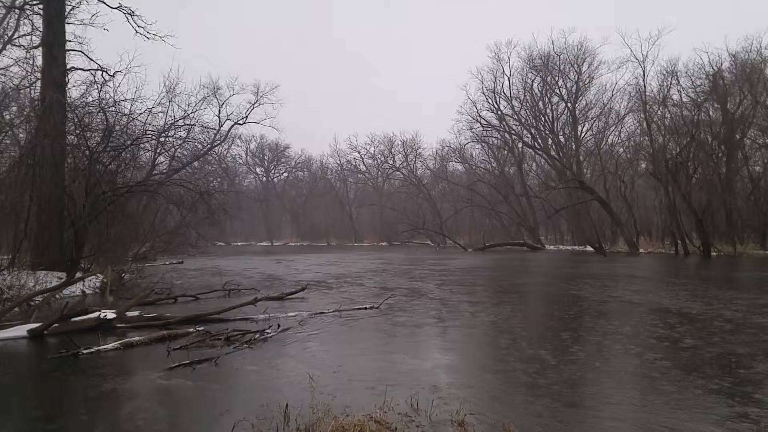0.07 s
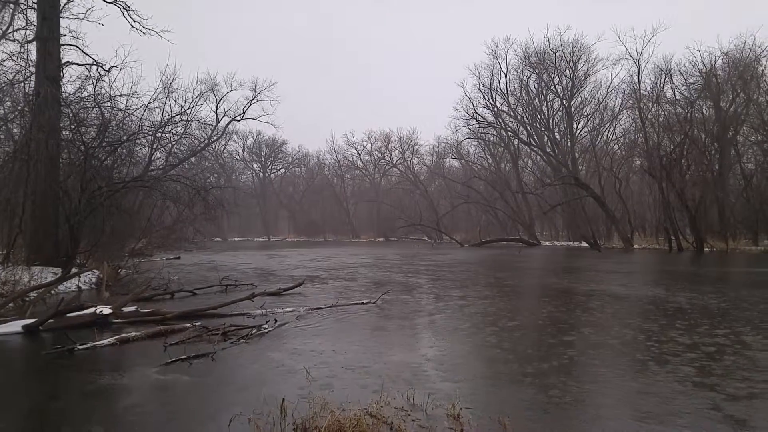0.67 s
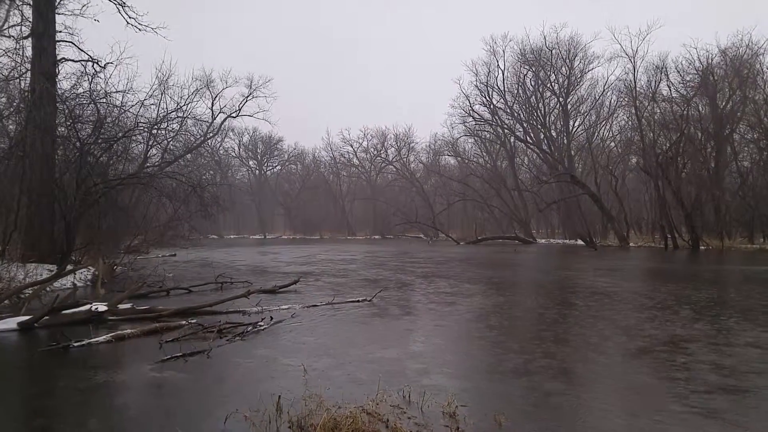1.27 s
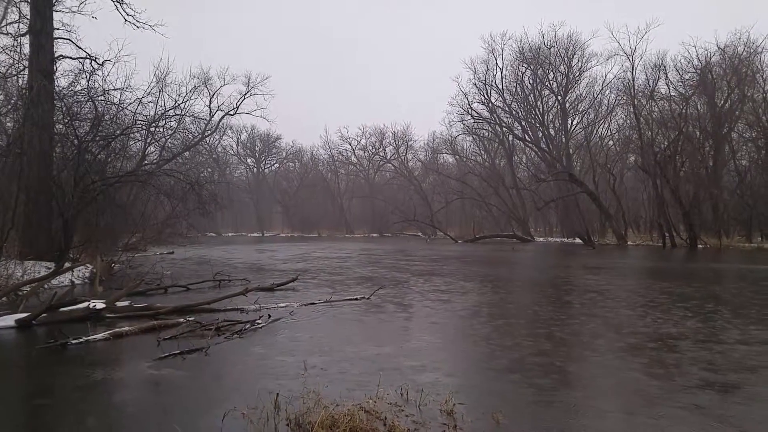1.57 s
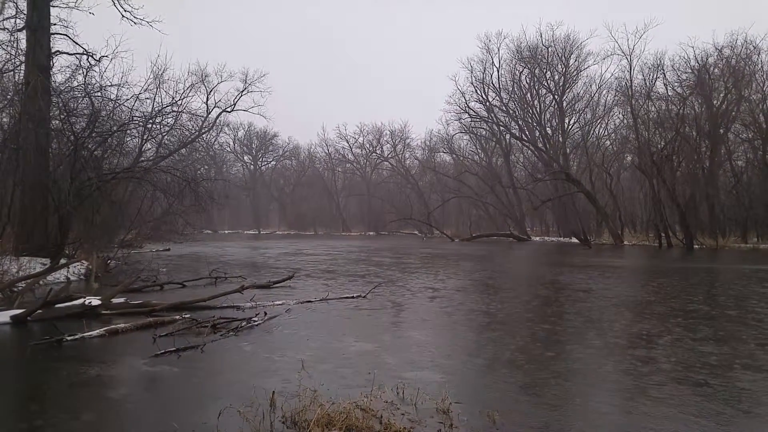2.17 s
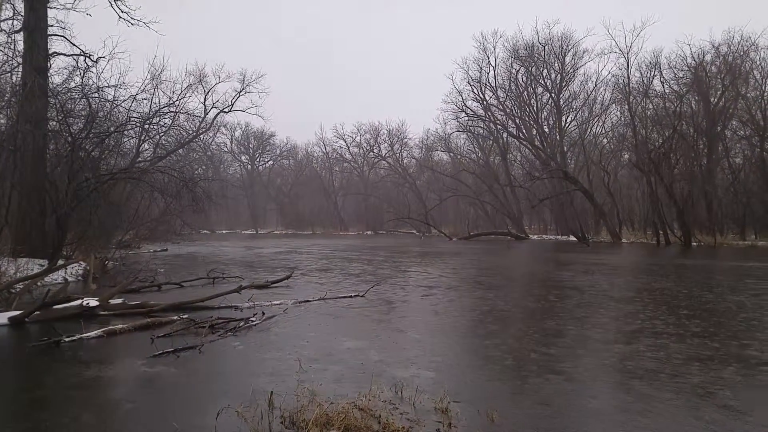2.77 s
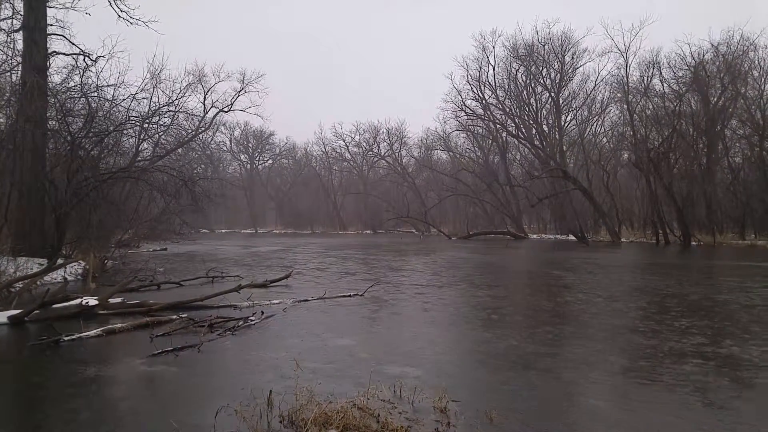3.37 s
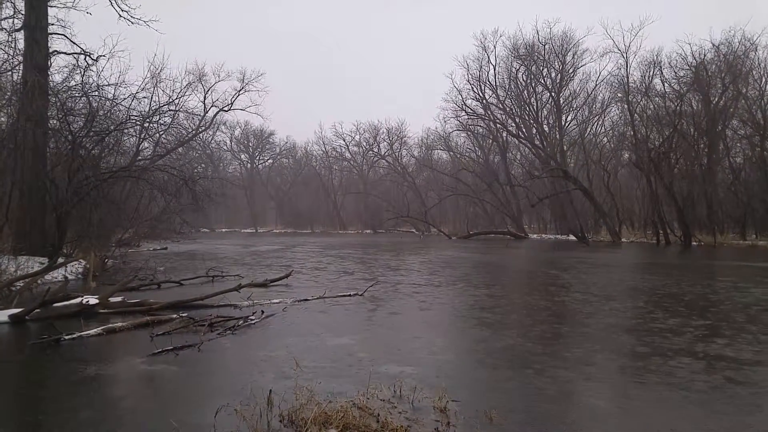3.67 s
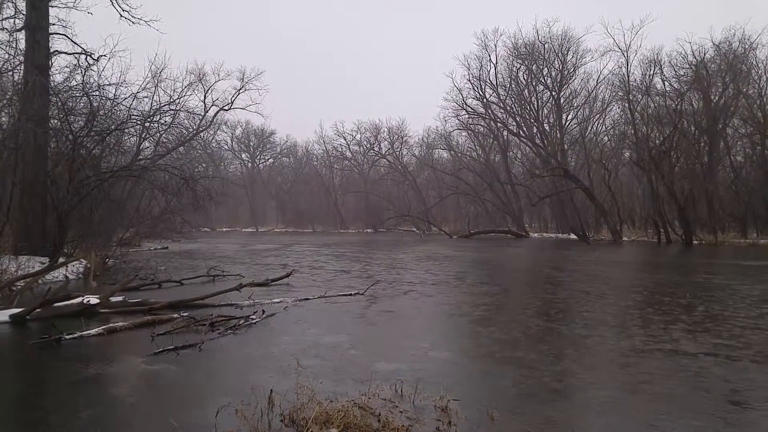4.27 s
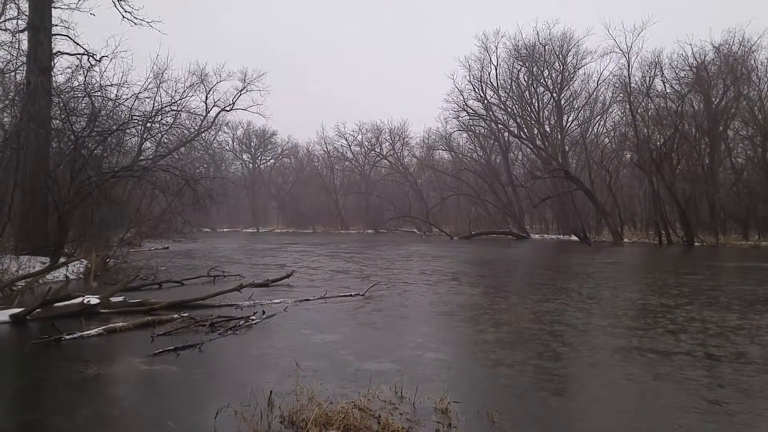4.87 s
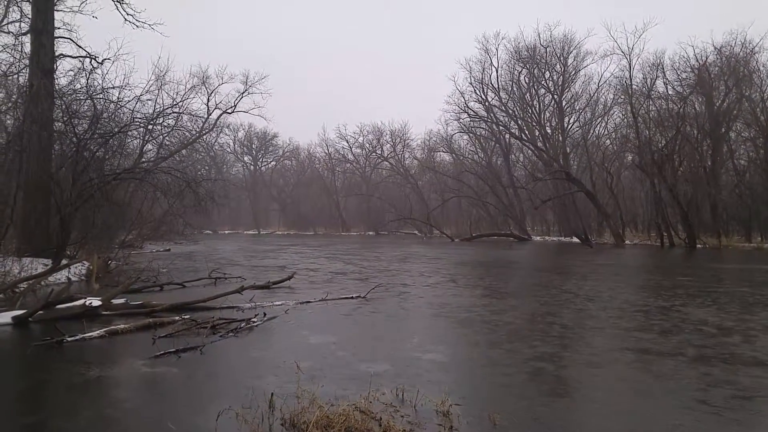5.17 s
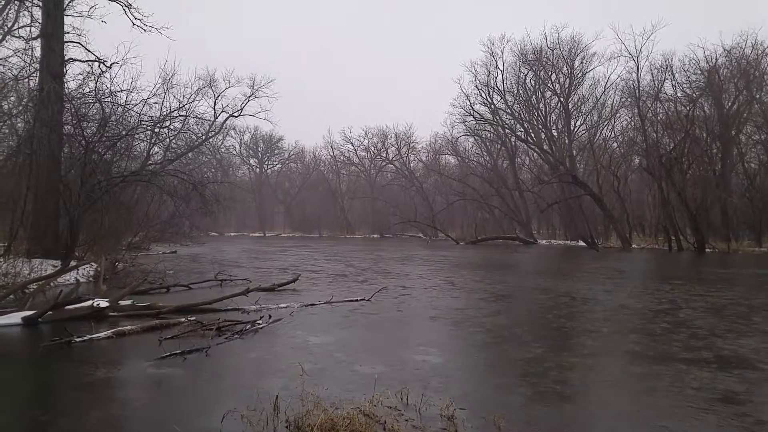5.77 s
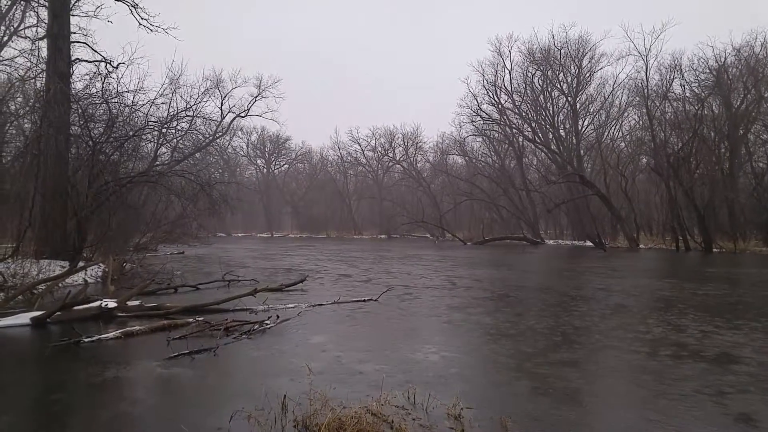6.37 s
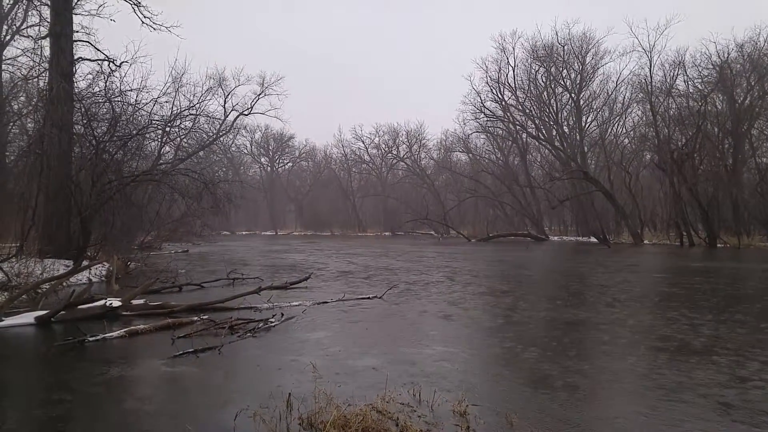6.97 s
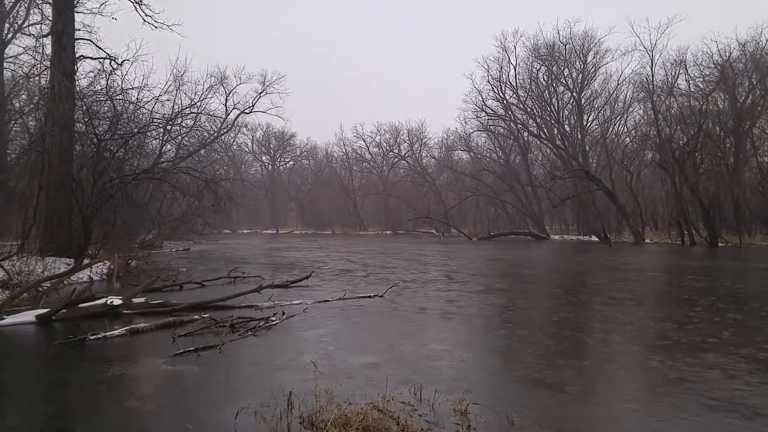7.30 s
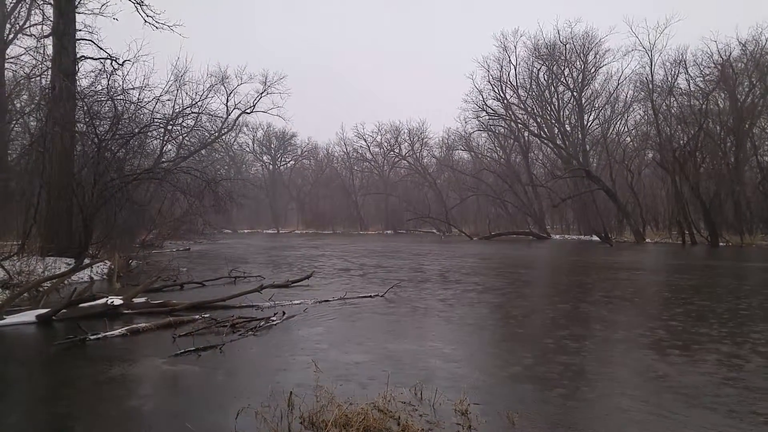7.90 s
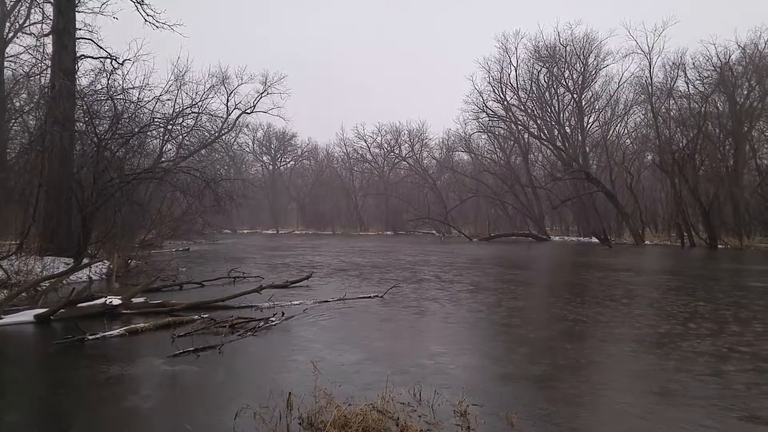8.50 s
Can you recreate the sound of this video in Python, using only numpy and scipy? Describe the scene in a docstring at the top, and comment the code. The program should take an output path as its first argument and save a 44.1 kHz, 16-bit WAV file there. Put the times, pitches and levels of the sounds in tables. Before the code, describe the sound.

Outdoors beside a river, a low, even rush of water lies under a continuous hiss and fine crackle of sleet on grass and twigs. Close, irregular pats on taut fabric mix with hard, bright ticks, mostly on the right. Early on come a soft handling bump and two deep thumps of ice striking the microphone. The sleet thickens slightly toward the middle, with occasional sharper hits, then eases a little.

```python
"""Sleet on a slow river.

Countless far pellets merge into a hiss over the low rush of the water; nearer ones click on bare banks.
Close pellets pat on fabric and tick on a camera case, where a hand shifts; a few hit a microphone port
and thump. The ports ring near 8 kHz, and the gain control ducks after the hardest thumps."""
import sys
import numpy as np
from scipy import signal
from scipy.fft import rfft, irfft, next_fast_len
from scipy.io import wavfile
from scipy.ndimage import map_coordinates

SR = 44100
rng = np.random.default_rng(int(sys.argv[2]) if len(sys.argv) > 2 else 0)


def unload_wav(signal):
    """Save mono or channel-first audio to the path in sys.argv[1] as 16-bit WAV at rate SR, clipped to [-1, 1]."""
    wavfile.write(
        sys.argv[1],
        SR,
        np.round(np.clip(np.atleast_2d(signal).T, -1, 1) * 32767).astype(np.int16),
    )


N = 381024
TIME_S = np.arange(N) / SR


def amp(db):
    """Decibels to gain."""
    return 10 ** (np.asarray(db) / 20)


def unit(x):
    """x scaled to rms 1."""
    return x / np.sqrt(np.mean(x ** 2) + 1e-20)


def along(points, hz):
    """(f/Hz, value) points read on a log axis."""
    knot_hz, values = np.transpose(points)
    return np.interp(np.log(hz + 1), np.log(knot_hz + 1), values)


def wobble(knots_per_s):
    """Smooth random curve."""
    return map_coordinates(rng.standard_normal(int(N * knots_per_s / SR) + 4), [TIME_S * knots_per_s])


def filtered(x, response):
    """x through the frequency response given by response(hz)."""
    size = 2 * next_fast_len(N // 2 + SR // 4)
    return irfft(rfft(x, size) * response(np.fft.rfftfreq(size, 1 / SR)), size)[..., :N]


def noise(spectrum):
    """Two independent noises of rms 1 with the given spectrum."""
    return unit(filtered(rng.standard_normal((2, N)), lambda hz: amp(along(spectrum, hz))))


# Water spectrum: f/Hz, relative density/dB
RIVER_SPECTRUM = [(20, -52), (45, -7), (70, -1), (180, -4.5), (340, 0.5), (650, -2), (1100, -17.5),
                  (2500, -21.5), (8000, -29)]
# Likeness of the river at the two ports: f/Hz, coherence
RIVER_COHERENCE = [(30, .05), (60, 0.92), (130, 0.99), (300, 0.83), (700, 0.32), (1400, 0)]

def river(level_db=-34.5):
    """Steady low rush of moving water, much alike at both ports."""
    def mid_side_gains(hz):
        angle = np.arccos(np.clip(along(RIVER_COHERENCE, hz), -1, 1)) / 2
        return np.array([np.cos(angle), np.sin(angle)])

    mid, side = filtered(noise(RIVER_SPECTRUM), mid_side_gains)
    return unit(np.array([mid + side, mid - side])) * amp(level_db)


# Strength of the sleet: t/s, level/dB
FALL_STRENGTH = [(0.6, 0.5), (2.6, 1.2), (4.0, 1.5), (5.2, 0.9), (5.8, -1.1), (8.64, -0.8)]

def fall_db(at_s):
    """Level offset as the sleet thickens and eases."""
    return np.interp(at_s, *np.transpose(FALL_STRENGTH))


# Distant sleet spectrum: f/Hz, relative density/dB
HISS_SPECTRUM = [(100, -44), (600, 3), (1500, -7.5), (2800, 0), (4500, 5), (9000, 3.5), (12000, 1),
                 (16000, 0)]

def far_sleet(level_db=-31.0, flutter_db=1.25):
    """Pellets all over the water and the woods merge into a hiss."""
    return noise(HISS_SPECTRUM) * amp(level_db + fall_db(TIME_S) + flutter_db * wobble(knots_per_s=14))


def shower(count, spread_db):
    """Random landing times and levels; the rare near pellets are the loud ones."""
    when, distance = rng.random((count, 2)).T
    at_s = when * N / SR
    nearness = -np.log(distance + .022)
    return at_s, fall_db(at_s) + spread_db * nearness


def pellets(count, top_db, range_db):
    """Random landing times and levels; small pellets are many, large loud ones few."""
    when, jitter = rng.random((count, 2)).T
    at_s = when * N / SR
    rank = (np.arange(count) + jitter) / count
    smallness = np.log1p(10 * rank) / np.log1p(10)
    return at_s, fall_db(at_s) + top_db - range_db * smallness


def impacts(at_s, db, modes, pitch, hard_db, pan_db, lag_s, crack, crack_t60_s, samples):
    """Each pellet cracks and rings the modes; the right port hears it lag_s later."""
    t = np.arange(samples) / SR
    hits = crack * np.diff(rng.standard_normal((len(at_s), samples + 1))) * amp(-60 * t / crack_t60_s)
    for k, (hz, mode_db, t60_s) in enumerate(modes):
        tilt_db = hard_db * (((k + 1) / len(modes)) ** 2 - .3)  # hard pellets favour high modes
        ring = (-1) ** k * np.sin(2 * np.pi * hz * pitch[:, None] * t) * amp(-60 * t / t60_s)
        hits = hits + np.reshape(amp(mode_db + tilt_db), (-1, 1)) * ring
    pair = []
    for side in (1, -1):  # left, right
        onset = np.round(np.abs(at_s - side * lag_s / 2) * SR).astype(int)
        index = onset[:, None] + np.arange(samples)
        gain = amp(db + side * np.clip(pan_db, -13, 13) / 2)
        pair.append(np.bincount(index.ravel(), (gain[:, None] * hits).ravel(), N)[:N])
    return np.array(pair)


# Frozen bank resonance: f/Hz, level/dB, t60/s
CRUST_MODES = [(6760, 0, 0.00063)]

def bank_sleet(level_db=-32):
    """Dense tiny clicks on grass, twigs and crust, from all sides."""
    at_s, db = shower(count=14000, spread_db=6.0)
    grain, pan, angle = rng.standard_normal((len(at_s), 3)).T
    pitch = np.clip(np.exp(0.42 * grain), .25, 2)
    clicks = impacts(at_s, db, CRUST_MODES, pitch, hard_db=4, pan_db=3.9 * pan,
                     lag_s=.0003 * angle, crack=0.18, crack_t60_s=0.0003, samples=48)
    return amp(level_db) * unit(clicks)


# Hand movements: t/s, level/dB, 1/e half-width/s
HAND_SHIFTS = [(0.75, -29, 0.037), (0.845, -15.5, 0.023), (0.887, -25.5, 0.041), (1, -18, 0.017)]
# Handling spectrum: f/Hz, relative density/dB
HAND_SPECTRUM = [(20, -27), (70, -4), (140, 2), (240, -12), (450, -14), (1500, -70)]

def hand_bumps(right_db=-14):
    """Soft bumps of a hand on the left of the case."""
    press = sum(amp(db) * np.exp(-((TIME_S - at_s) / width_s) ** 2) for at_s, db, width_s in HAND_SHIFTS)
    return noise(HAND_SPECTRUM) * press * amp([[0], [right_db]])


# Heaviest pellets on the fabric: t/s, level/dB, hardness/dB
HEAVY_PATS = [(0.6336, -9, -1), (1.6682, -9, -8), (2.0872, -8, 1), (2.4904, -11, 10), (2.6567, -11.5, 6),
              (2.7379, -9.5, 1), (3.6587, -3.5, -5), (4.2774, -10.5, -7), (4.4305, -10, 2), (4.689, -9, -3),
              (4.706, -7.5, -3), (4.7883, -9.5, 2), (5.2683, -9.5, 4), (5.7094, -9, -11), (5.7579, -9, 0),
              (5.7864, -10.5, -10), (6.0579, -10.5, -10), (6.2727, -10.5, -1), (6.84, -13.5, 9),
              (6.8931, -9.5, 2), (6.9362, -10, 1), (7.2366, -12, -5), (7.294, -5.5, -9),
              (7.7882, -10.5, -5), (7.9237, -5.5, -5)]
# Fabric resonances: f/Hz, level/dB, t60/s
FABRIC_MODES = [(810, -0.5, 0.005), (1280, 2.5, 0.003), (1900, 1, 0.0028), (4020, -4, 0.0035)]

def fabric_pats(spray_db=-35.5, hardness_db=-9.5, dulling_db_per_db=0.7, scatter_db=8):
    """Dull pats on taut fabric: a few heavy pellets, a middling patter and a fine spray."""
    spray = np.column_stack(shower(count=1300, spread_db=3.0)) + [0, spray_db]
    patter = np.column_stack(pellets(count=170, top_db=-12.5, range_db=12))
    at_s, db = np.vstack([patter, spray]).T
    hard_db = np.minimum(hardness_db - dulling_db_per_db * db, 3)  # heavier sinks deeper, sounds duller
    hard_db += scatter_db * rng.uniform(-1, 1, len(at_s))
    at_s, db, hard_db = np.vstack([HEAVY_PATS, np.column_stack([at_s, db, hard_db])]).T
    spot, pan, angle = rng.standard_normal((len(at_s), 3)).T
    pitch = np.exp(.13 * spot)  # each spot has its own pitch
    return impacts(at_s, db, FABRIC_MODES, pitch, hard_db, pan_db=2 * pan - 0.5,
                   lag_s=.00026 + .00008 * angle, crack=.05, crack_t60_s=.0015, samples=240)


# Loudest ticks on the case: t/s, level/dB, left minus right/dB, hardness/dB; the rows at 1.5814, 1.6909, 2.0117
# and 4.8163 are the bright clicks of the port strikes below, and 3.0255 is the rebound of the 3.0236 pellet
HEAVY_TICKS = [(0.8059, -13.5, 4, 3), (0.8126, -14, 14, -5), (1.1179, -18, 7, 9), (1.2694, -16, -12, 3),
               (1.5814, -14.5, -11, 1), (1.6909, -16, 2, 11), (1.7668, -1, -17, -7), (2.0117, -12, -13, 9),
               (2.0557, -14.5, -5, -15), (2.1331, -20, -12, -4), (2.6214, -20, -11, -8),
               (2.7919, -19, 4, -22), (3.0236, -8, -9, 7), (3.0255, -17, -6, 7), (3.0965, -18, 2, 0),
               (3.3311, -10.5, -27, -4), (3.8532, -16, -4, -18), (3.8804, -17, -11, 7),
               (4.7556, -14, -7, -15), (4.8163, -11, 14, -2), (5.0439, -18.5, -15, 12),
               (5.4339, -13, -18, 3), (6.5484, -12.5, -7, 10), (6.629, -14, -3, 7),
               (7.4184, -15.5, -13, -9), (7.9458, -16.5, -5, 3), (8.0973, -17, 0, -17)]
# Case resonances: f/Hz, level/dB, t60/s
CASE_MODES = [(6270, 4.5, 0.0013), (8480, 4.5, 0.0021), (11400, 6, 0.00094), (13700, 0, 0.0021)]

def case_ticks(rebound_s=0.002, rebound_loss_db=12):
    """Hard, bright ticks of ice on the case, which is exposed on its right; each pellet rebounds once."""
    at_s, db = pellets(count=130, top_db=-21.5, range_db=15)
    pan, hard = rng.uniform(-np.sqrt(3), np.sqrt(3), (len(at_s), 2)).T  # unit variance
    pan_db = -6 + 7 * pan
    hard_db = 9 + 5 * hard
    light_ticks = np.column_stack([at_s, db, pan_db, hard_db])
    at_s, db, pan_db, hard_db = np.vstack([HEAVY_TICKS, light_ticks]).T
    spot, flight = rng.standard_normal((len(at_s), 2)).T
    pitch = np.exp(0.025 * spot)
    contacts = [(at_s, db), (at_s + rebound_s * np.exp(.5 * flight), db - rebound_loss_db)]
    return sum(impacts(contact_s, contact_db, CASE_MODES, pitch, hard_db, pan_db,
                       lag_s=0, crack=0.63, crack_t60_s=0.0034, samples=200)
               for contact_s, contact_db in contacts)


# Pellets on a port: t/s, level/dB, thump offset/dB, hardness/(dB/octave), channel (0 left, 1 right)
PORT_STRIKES = [(1.5814, -1, 4, 1, 1), (1.691, 3, 9, 1.5, 0), (2.012, -6, -21, -4.5, 1),
                (3.026, -7.5, -20, -3.5, 1), (4.817, 0, -26.5, -6, 1)]
# Struck port resonances, deep thump first: f/Hz, level/dB, t60/s
STRUCK_PORT_MODES = [(55, 3.5, 0.07), (116, -7, 0.014), (258, -4, 0.013), (557, 2.5, 0.022),
                     (1370, -1.5, 0.0066), (1600, -3.5, 0.0087), (4230, -10.5, 0.0042)]

def port_thumps():
    """A pellet on a port shoves the air behind it: a knock and a deep thump in that channel alone."""
    pair = np.zeros((2, N + SR))
    t = np.arange(SR // 4) / SR
    for at_s, db, thump_db, tilt_db_per_octave, channel in PORT_STRIKES:
        rings = []
        for k, (hz, mode_db, t60_s) in enumerate(STRUCK_PORT_MODES):
            envelope = amp(mode_db + tilt_db_per_octave * np.log2(hz / 500) - 60 * t / t60_s)
            rings.append((-1) ** k * envelope * np.sin(2 * np.pi * hz * t))
        thump, *knock = rings
        onset = round(at_s * SR)
        pair[int(channel), onset:onset + len(t)] += amp(db) * (amp(thump_db) * thump + sum(knock))
    return pair[:, :N]


def scene():
    """River, sleet from far to near, and the hand."""
    return (river() + far_sleet() + bank_sleet()
            + fabric_pats() + case_ticks() + port_thumps() + hand_bumps())


def resonances(bands, hz):
    """Minimum-phase response of a set of peaks and notches."""
    gain_db = sum(db / (1 + (2 * (hz - centre_hz) / width_hz) ** 2) for centre_hz, width_hz, db in bands)
    cepstrum = irfft(np.log(amp(gain_db)))
    half = len(cepstrum) // 2
    cepstrum[1:half] *= 2
    cepstrum[half + 1:] = 0
    return np.exp(rfft(cepstrum))


def gain_control(x, threshold_db, release_db_per_s, window_s, depth_db):
    """Gain drops by up to depth_db when the louder channel passes the threshold, then creeps back."""
    size = max(int(window_s * SR), 2)
    power = signal.fftconvolve(np.max(x ** 2, axis=0), np.ones(size) / size)[:N]
    excess_db = np.clip(10 * np.log10(np.abs(power) + 1e-12) - threshold_db, 0, depth_db)
    ramp_db = release_db_per_s * TIME_S
    return x * amp(ramp_db - np.maximum.accumulate(excess_db + ramp_db))


# Colour of both ports: f/Hz, width/Hz, gain/dB
PORT_BANDS = [(519, 119, -13), (7802, 527, -11), (8026, 2330, 21), (8500, 1170, -4.5)]
# Colour the case adds at the right port: f/Hz, width/Hz, gain/dB
RIGHT_CASE_BANDS = [(55, 90, -0.5), (520, 126, -3), (1920, 1070, 6), (2800, 430, -6.5), (4170, 2000, 4.5),
                    (5970, 2500, -3), (9240, 2800, -1.5), (13000, 2500, 1)]

def record(dry, low_cut_hz=36, overload=1.18, start_s=0.609, top_hz=15800):
    """Port colour, bass cut, overload, gain control, silence until start_s and the band limit."""
    left, right = filtered(dry, lambda hz: resonances(PORT_BANDS, hz))
    right = filtered(right, lambda hz: resonances(RIGHT_CASE_BANDS, hz))
    low_cut = signal.butter(3, low_cut_hz, "highpass", fs=SR, output="sos")
    pair = signal.sosfilt(low_cut, [left, right])
    pair = np.clip(pair, -overload, overload)
    # slow stage ducks after thumps, quick stage after sharp ticks
    pair = gain_control(pair, threshold_db=-12.5, release_db_per_s=9, window_s=.04, depth_db=5.5)
    pair = gain_control(pair, threshold_db=-8, release_db_per_s=65, window_s=.0025, depth_db=2.5)
    pair = np.clip(pair, -1, 1) * (TIME_S > start_s)
    return filtered(pair, lambda hz: 1 / (1 + (hz / top_hz) ** 160))


dry = scene()
out = record(dry)
unload_wav(out)
```